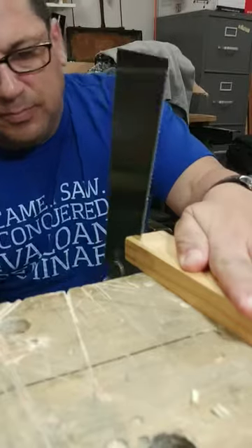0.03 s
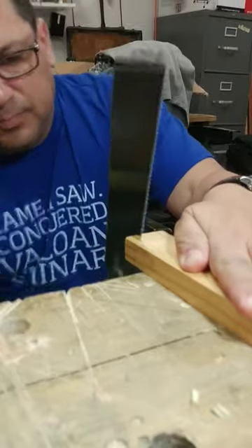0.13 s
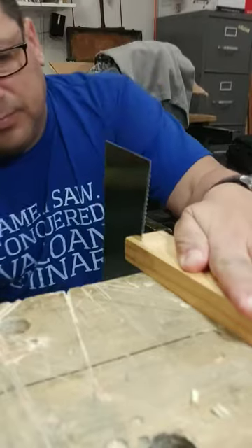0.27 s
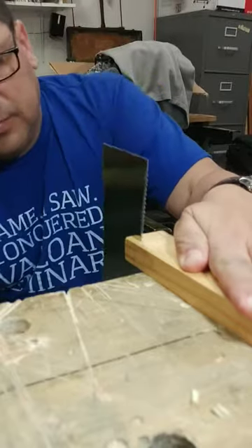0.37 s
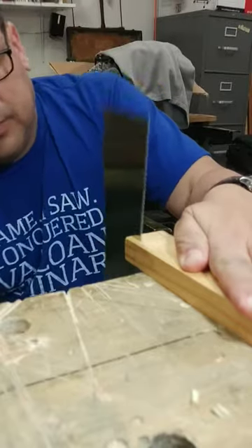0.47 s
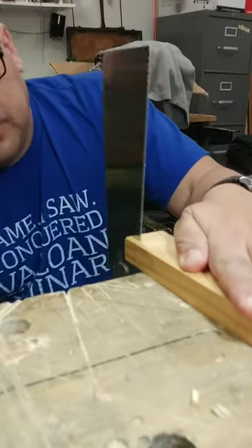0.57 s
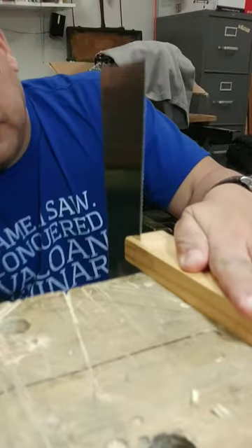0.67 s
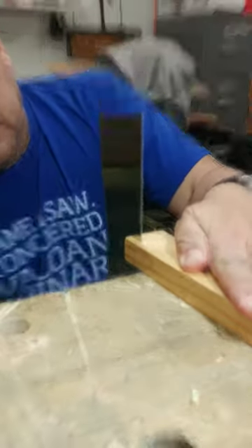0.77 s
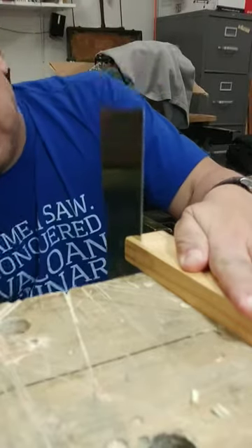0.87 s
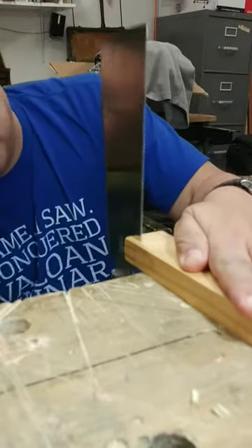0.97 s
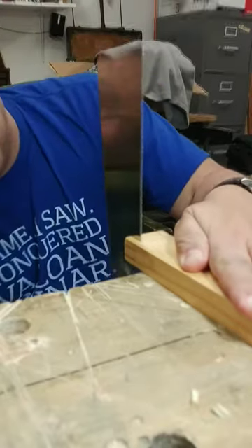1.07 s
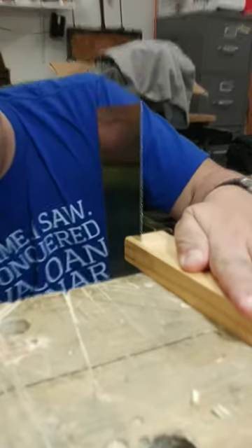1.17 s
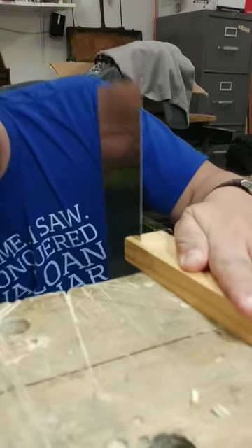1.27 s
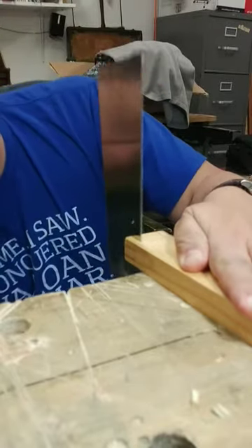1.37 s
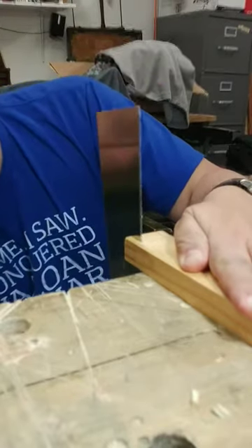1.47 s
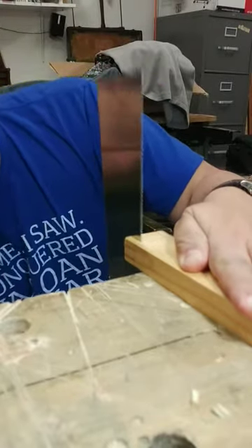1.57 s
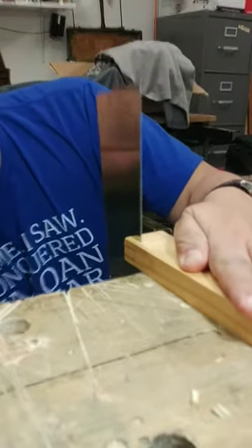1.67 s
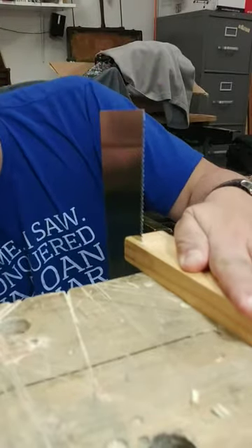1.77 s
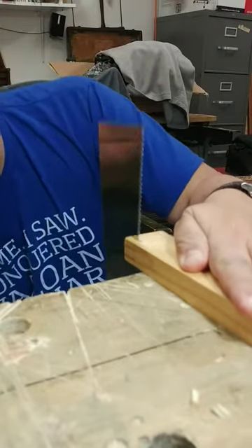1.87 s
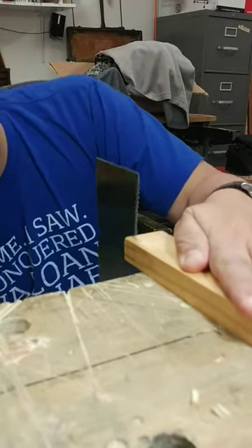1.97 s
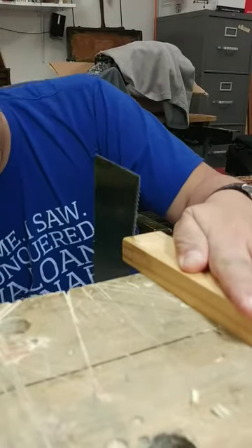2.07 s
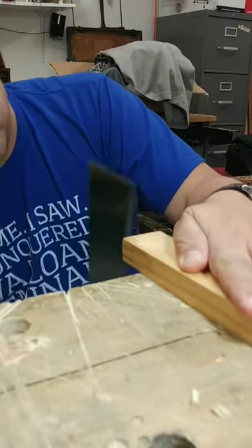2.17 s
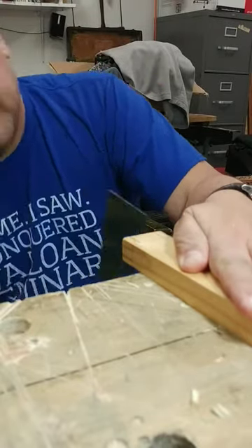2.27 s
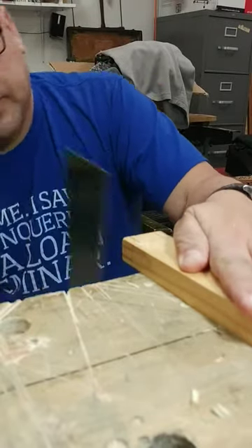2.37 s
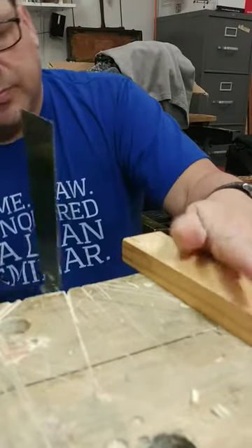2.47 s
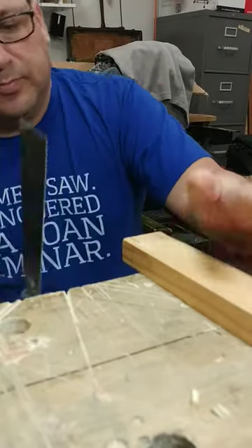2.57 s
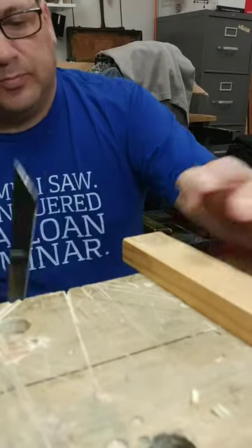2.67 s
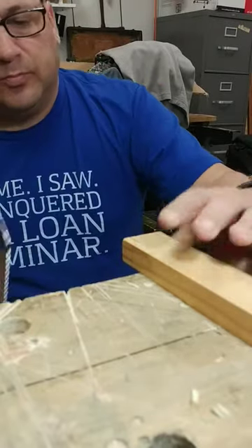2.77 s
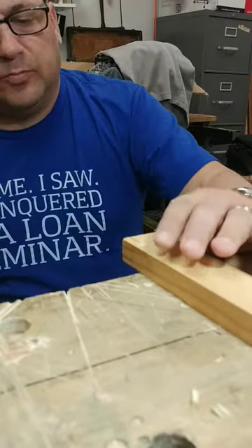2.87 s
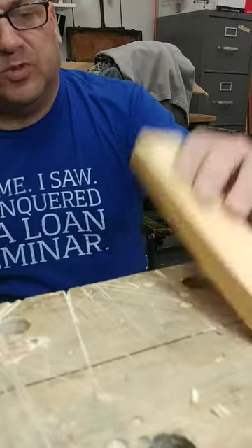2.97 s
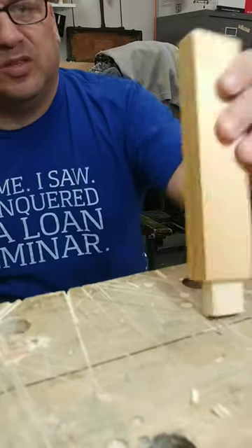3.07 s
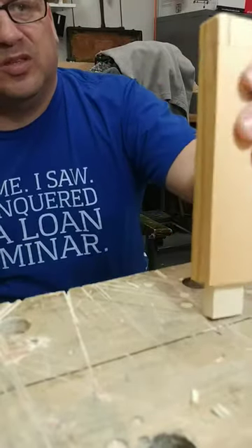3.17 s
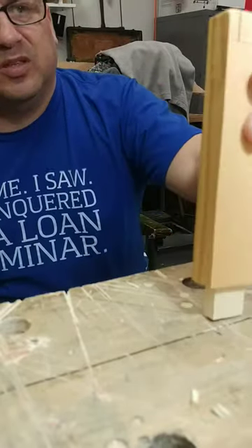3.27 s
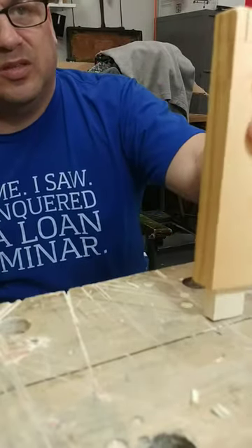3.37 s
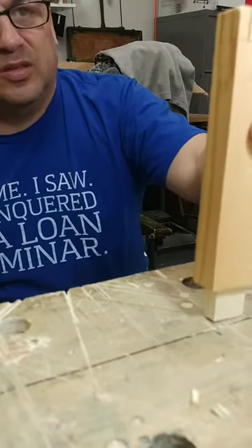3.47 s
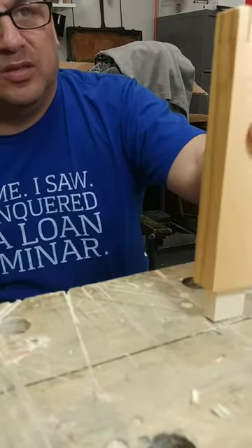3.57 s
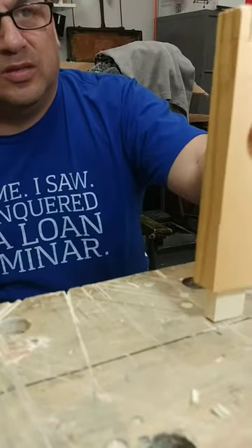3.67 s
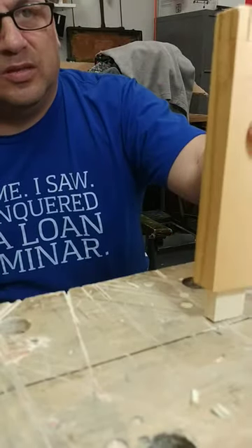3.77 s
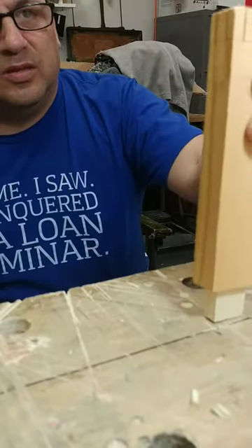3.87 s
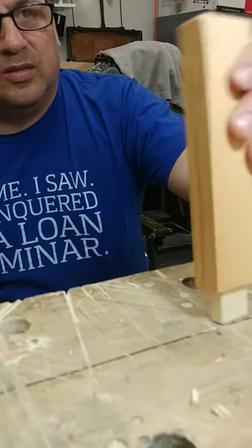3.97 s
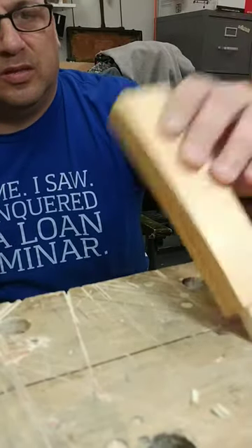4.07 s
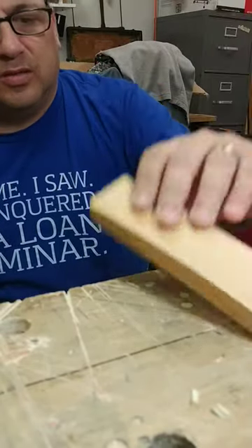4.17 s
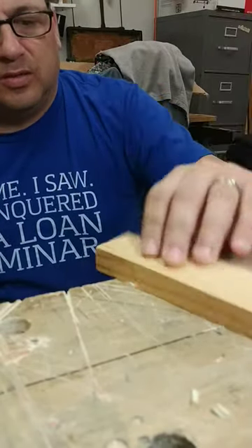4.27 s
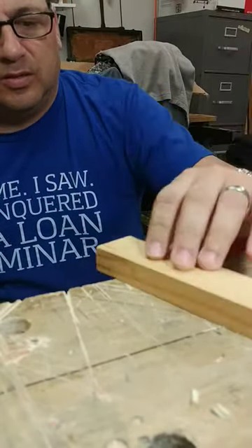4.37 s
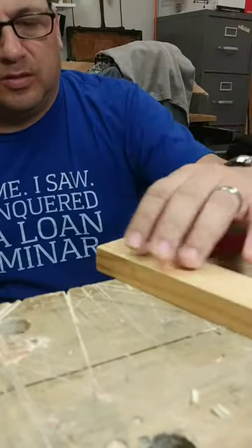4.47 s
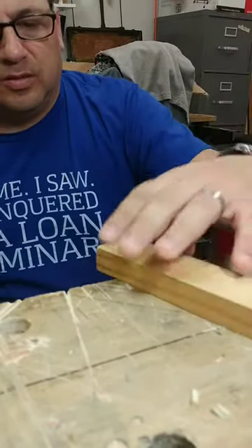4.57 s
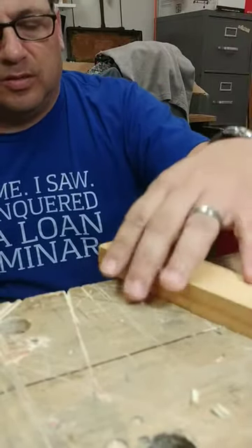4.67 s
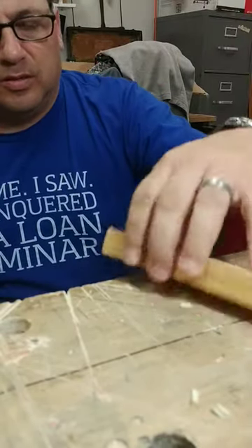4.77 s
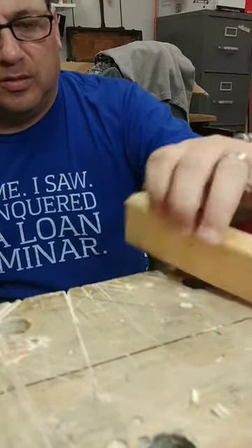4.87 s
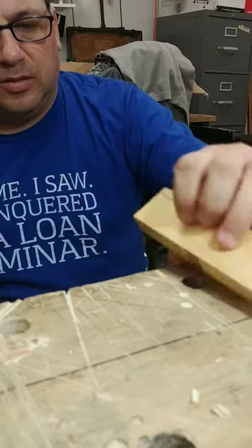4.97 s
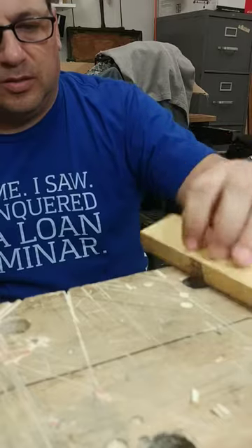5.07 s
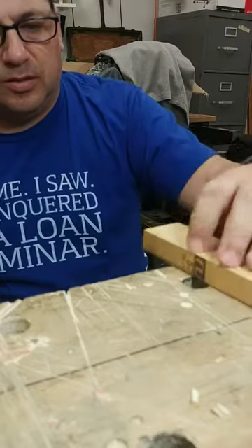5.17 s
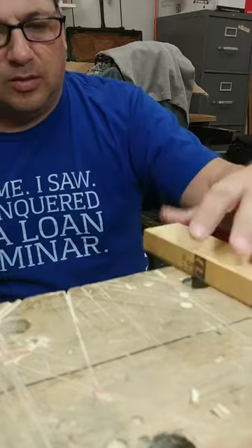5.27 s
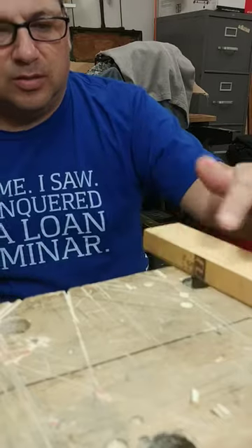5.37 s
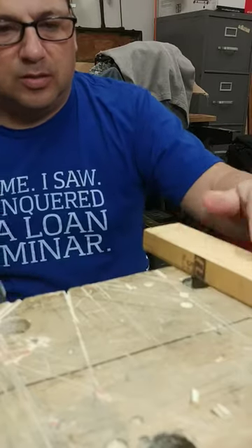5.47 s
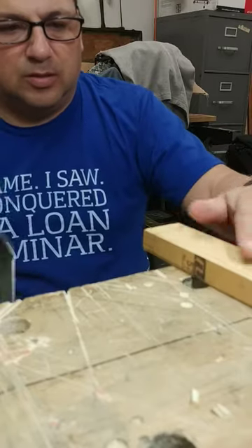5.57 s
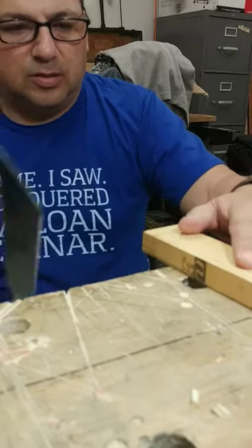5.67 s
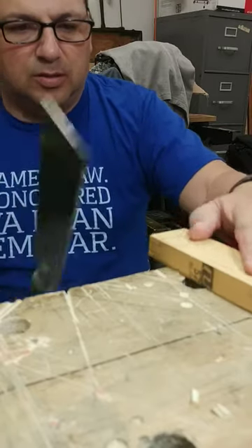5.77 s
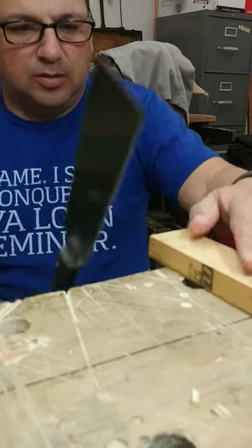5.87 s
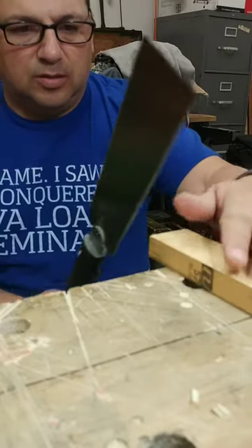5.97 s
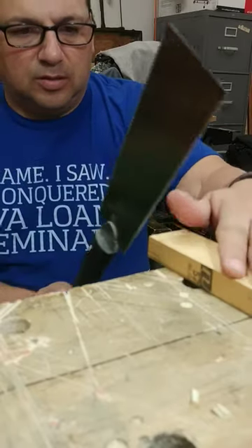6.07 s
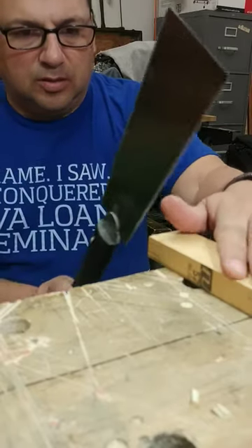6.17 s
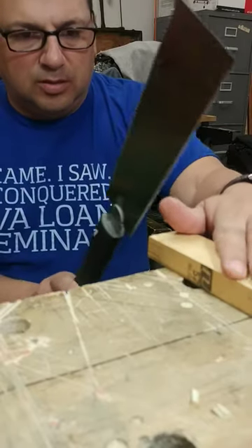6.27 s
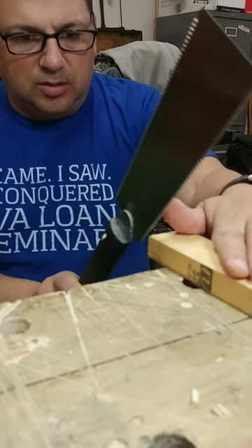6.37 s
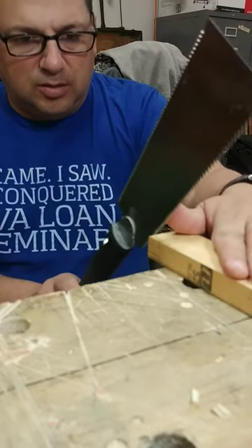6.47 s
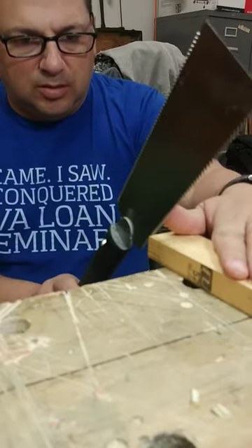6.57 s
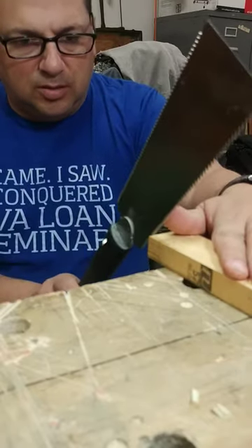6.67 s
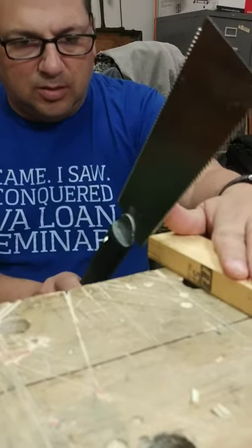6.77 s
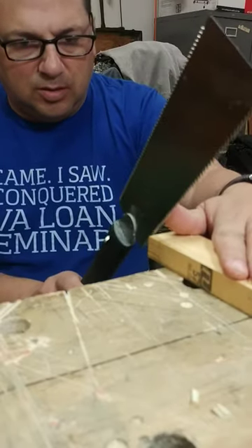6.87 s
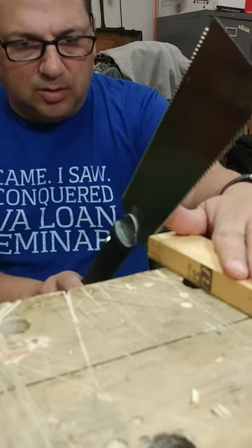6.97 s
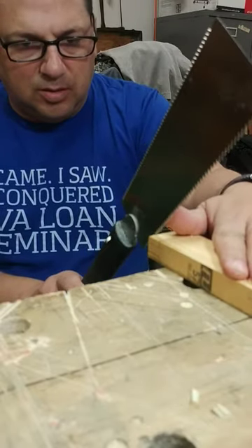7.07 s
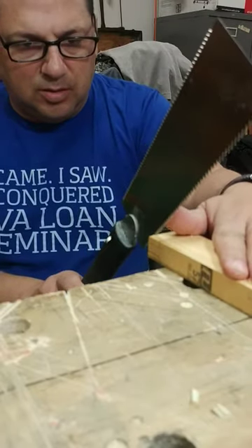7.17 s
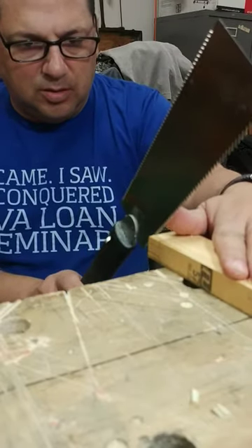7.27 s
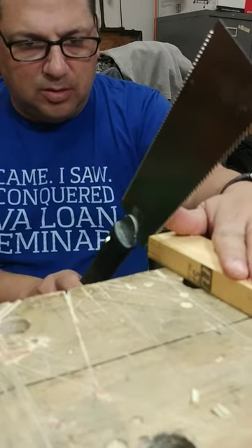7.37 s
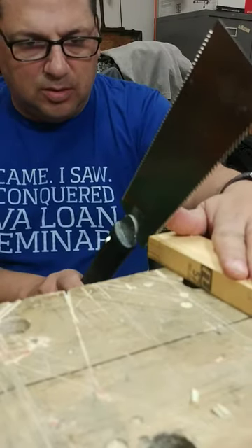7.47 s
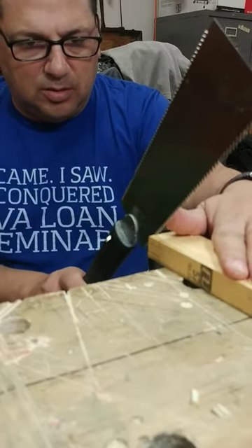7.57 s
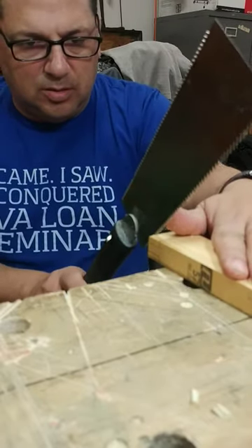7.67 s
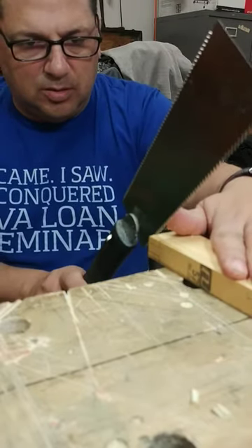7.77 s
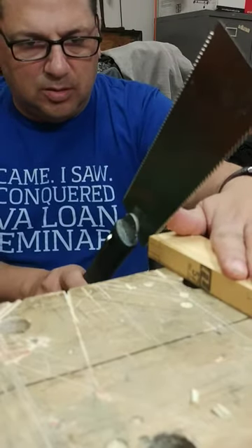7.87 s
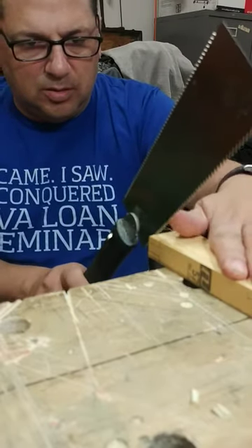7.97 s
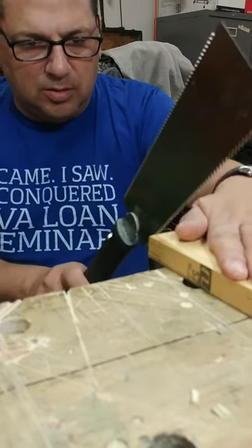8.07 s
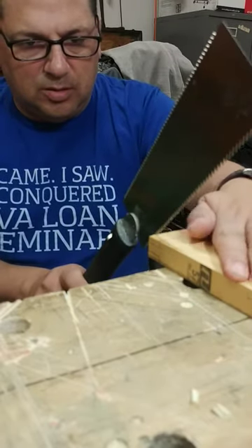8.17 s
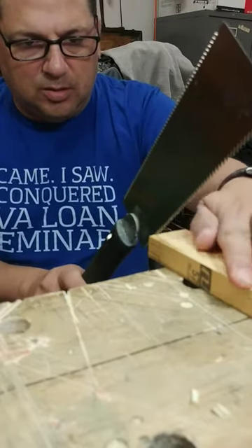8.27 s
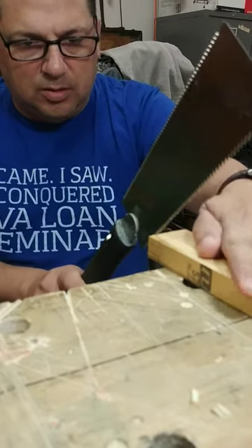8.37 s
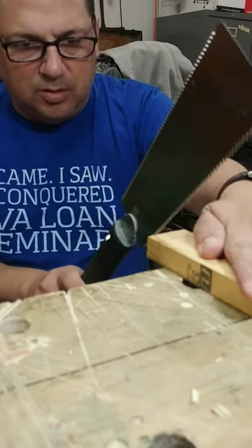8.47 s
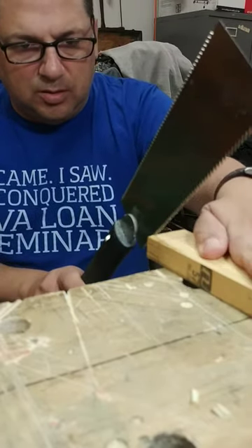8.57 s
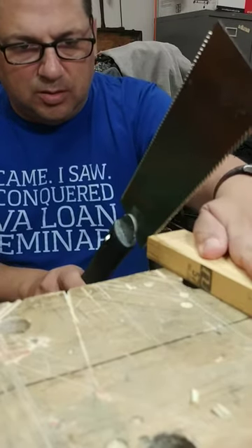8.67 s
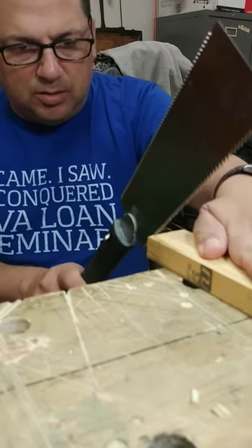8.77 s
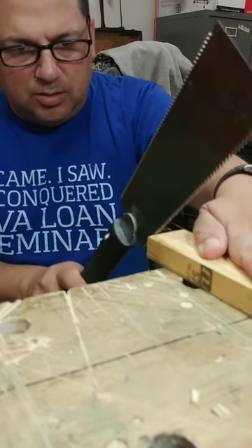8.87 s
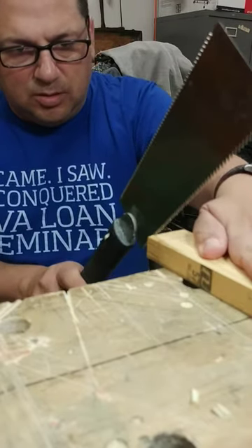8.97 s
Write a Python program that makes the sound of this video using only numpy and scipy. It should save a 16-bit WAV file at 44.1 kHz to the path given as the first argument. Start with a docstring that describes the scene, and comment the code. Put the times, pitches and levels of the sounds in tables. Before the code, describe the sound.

Close to a phone in a small workshop, a thin hand saw rasps through a board: loud, drumming pulls alternating with softer, noisier pushes. The last cuts turn thin and the freed blade rings faintly. The board then knocks, scrapes and squeaks on the bench, drops with loud double clacks, and is knocked once more. Only tiny rubs and taps remain over low rumble and faint hiss.

```python
"""In a small workshop a thin pull saw rasps through the end of a board on a bench, heard by a phone close by.
Stick-slip friction excites the wood: heavy pulls, light pushes, two thin last cuts; then the freed blade rings.
The board is slid, squeaks as it is stood on end, is knocked down twice and settled by hand: friction noise for
rubbing, damped resonances for blows. Scattering and a diffuse tail make the room, over a low rumble and hiss."""
import sys
import numpy as np
from scipy import signal
from scipy.fft import rfft, irfft
from scipy.io import wavfile
from scipy.ndimage import uniform_filter1d

SR = 44100
rng = np.random.default_rng(int(sys.argv[2]) if len(sys.argv) > 2 else 0)


def inscribe(sig):
    """Save sig as 16-bit PCM at rate SR to the path in sys.argv[1].

    A 1-D sig is mono; a 2-D sig holds one channel per row.
    Samples are clipped to [-1, 1] before scaling.
    """
    pcm = np.round(np.clip(np.atleast_2d(sig).T, -1, 1) * 32767)
    wavfile.write(sys.argv[1], SR, pcm.astype(np.int16))


N = 397782
T = np.arange(N) / SR
RING_T = T[:SR // 2]

# saw pulled, teeth biting: start_s, rise_s, hold_s, fall_s, level_db, hiss_db (tooth hiss relative to level)
PULL_STROKES = [(0.211, 0.021, 0.093, 0.1, -7, -26.5), (0.737, .022, 0.094, 0.052, -7.5, -26),
                (1.118, 0.038, 0.084, 0.07, -7.5, -26), (1.452, .028, .075, .055, -8.5, -25),
                (1.72, 0.027, .049, 0.07, -8, -27)]
# the last fibres give way: start_s, rise_s, hold_s, fall_s, level_db, hiss_db (relative to level)
LAST_STROKES = [(1.925, .022, 0.092, .07, -15.5, -22), (2.215, .014, 0.044, .025, -27, -20.5)]
# colour of teeth skating through wood: frequency_hz, gain_db
SKATING_COLOUR = [(35, -32), (70, -8), (125, -3), (220, -1.5), (350, 1.5), (430, -1.5), (700, -3.5),
                  (1100, -3.5), (1700, -18), (2700, -21.5), (3600, -38), (6000, -36.5), (9000, -36),
                  (15000, -57)]
# resonances of the board held down on the bench: frequency_hz, width_hz, boost_db
HELD_BOARD_MODES = [(127, 14, 13), (492, 61, 8.5), (565, 90, 4), (1362.6, 70, 7.5), (2760, 110, 1.5)]


def undb(db):
    """Decibels to amplitude ratio: 20 dB is a factor of ten."""
    return 10 ** (np.asarray(db) / 20)


def unit(h):
    """Energy normalisation: a response scaled so that its squares sum to 1."""
    return h / np.sqrt(np.sum(h ** 2, axis=-1, keepdims=True))


def ring(x, h):
    """Linear system: the output is the input convolved with the impulse response."""
    return signal.fftconvolve(np.atleast_2d(x), np.atleast_2d(h), axes=-1)[:, :N]


def response(points, peaks=(), size=8192):
    """Minimum phase: a causal response from (Hz, dB) gains and (Hz, width Hz, boost dB) resonances."""
    hz, db = np.transpose(points)
    f = np.arange(size // 2 + 1) * SR / size
    gain = undb(np.interp(np.log(f + 1), np.log(hz), db))
    for centre, width, boost_db in peaks:
        detuning = 2 * (f - centre) / width
        gain = gain * np.sqrt(1 + (undb(boost_db) ** 2 - 1) / (1 + detuning ** 2))
    # folding the cepstrum onto positive times makes the response causal
    cepstrum = irfft(np.log(gain))
    cepstrum[1:size // 2] *= 2
    cepstrum[size // 2 + 1:] = 0
    impulse = irfft(np.exp(rfft(cepstrum)))
    return np.pad(impulse, (0, len(RING_T) - size))


def modes(rows):
    """Modal superposition: damped resonances (Hz, width Hz, dB) summed; a wider one decays faster."""
    total = 0
    for hz, width, db in rows:
        decay = np.exp(-np.pi * width * RING_T)
        total = total + undb(db) * unit(decay * np.cos(2 * np.pi * hz * RING_T))
    return unit(total)


def band(x, hz, kind, order=2):
    """Butterworth filtering: low-pass or high-pass with a maximally flat passband."""
    sections = signal.butter(order, min(hz, .45 * SR), kind, fs=SR, output="sos")
    return signal.sosfilt(sections, x)


def add(out, s, sound):
    """Superposition: mix a sound in from time s (seconds)."""
    start = max(int(s * SR), 0)
    out[start:start + len(sound)] += sound[:N - start]


def walk(rate):
    """Smoothed random process: rate new values per second, spread near 1."""
    k = max(int(SR / rate), 1)
    steps = np.repeat(rng.standard_normal(N)[:N // k + 1], k)[:N]
    return 1.2 * uniform_filter1d(steps, k)


def gesture(start, rise, hold, fall, depth_db, sag_db):
    """Force envelope: a movement swells from depth_db below its top, sags while held, dies away and stops."""
    edge_s = 0.011  # time for a contact to make or break
    corners = start + np.cumsum(np.abs([0, rise, hold, fall]))
    gate = np.clip(np.minimum(T - corners[0], corners[-1] - T) / edge_s + 1, 0, 1)
    on = gate > 0
    gate[on] *= undb(np.interp(T[on], corners, [-depth_db, 0, -sag_db, -depth_db]))
    return gate


def effort(moves, depth_db, sag_db):
    """Amplitude modulation: force and hiss of a set of hand movements, silent between them."""
    # the hand never presses quite evenly
    uneven_db, uneven_per_s = 1.16, 22

    def movement(start, rise, hold, fall, db, hiss_db, fading=0):
        """Hiss follows force, fading by so many dB per second (growing if negative)."""
        force = undb(db) * gesture(start, rise, hold, fall, depth_db, sag_db)
        elapsed = np.clip(T - start, 0, rise + hold + fall)
        return np.array([force, force * undb(hiss_db - fading * elapsed)])

    return sum(movement(*move) for move in moves) * undb(uneven_db * walk(uneven_per_s))


def catches(rate, jitter, spread_db, tear_s):
    """Stick-slip: uneven snaps at a rate (Hz), each with a puff of tearing fibres; both have rms near 1."""
    phase = np.cumsum(rate * np.exp(jitter * walk(400))) / SR
    at = np.flatnonzero(np.diff(np.floor(phase)))
    snaps = np.zeros(N)
    snaps[at] = undb(spread_db * np.clip(rng.standard_normal(N)[:len(at)], -2, 2))
    # the hand keeps the mean force steady
    snaps /= np.sqrt(np.abs(uniform_filter1d(snaps ** 2, size=1500)) + 1e-9)
    puff = np.abs(ring(snaps ** 2, unit(np.exp(-RING_T / tear_s)) ** 2)[0])
    tearing = np.sqrt(puff) * rng.standard_normal(N)
    return snaps - uniform_filter1d(snaps, size=700), tearing


def scrape(force, hiss, contact, body, snap_share):
    """Source and resonator: snaps and tearing shake the wood; above about 4 kHz the fibres hiss by themselves."""
    # share of hiss power that both ports hear alike; the rest comes from all along the blade and board
    alike = .55
    snaps, tearing = contact
    share = np.clip(snap_share, 0, 1)
    drive = np.sqrt(share) * snaps + np.sqrt(1 - share) * tearing
    wood = band(body, 4400, "low", order=4)
    wood = wood / np.linalg.norm(band(wood, 230, "high"))
    random_signs = np.sign(rng.standard_normal((2, N)))
    fibres = tearing * (np.sqrt(alike) + np.sqrt(1 - alike) * random_signs)
    hiss_colour = unit(band(body, 4200, "high", order=4))
    return ring(force * drive, wood) + undb(-3.5) * ring(hiss * fibres, hiss_colour)


def tooth_rate(strokes, top_hz):
    """Kinematics: teeth per second follow the speed of the arm, rising and falling in every stroke."""
    speed = np.zeros(N)
    for start, rise, hold, fall, *_ in strokes:
        speed += np.sin(np.pi * np.clip((T - start) / (rise + hold + fall), 0, 1))
    return top_hz * (.35 + .65 * speed)


def pulls():
    """Stick-slip into a coupled resonator: on the pull the teeth bite, and the whole bench drums."""
    # colour of biting teeth: frequency_hz, gain_db
    biting_colour = [(35, -39.5), (70, -12), (125, -6.5), (190, -13), (350, -7), (430, -15), (700, -13.5),
                     (1100, -11.5), (1700, -23.5), (2700, -27), (3600, -38), (6000, -38), (9000, -41),
                     (15000, -53)]
    contact = catches(tooth_rate(PULL_STROKES, top_hz=719.7), jitter=.35, spread_db=3.0, tear_s=.0012)
    body = band(response(biting_colour, HELD_BOARD_MODES), 55, "high")
    force, hiss = effort(PULL_STROKES, depth_db=19.5, sag_db=1.5)
    return scrape(force, hiss, contact, body, snap_share=0.71)


def pushes():
    """Sliding friction, mostly noise: on the push the teeth skate through the kerf on their backs."""
    # saw pushed back: start_s, rise_s, hold_s, fall_s, level_db, hiss_db (relative to level)
    push_strokes = [(0.0, 0.0059, 0.08, .04, -14, -24), (0.475, .085, 0.073, .075, -11.5, -24.5),
                    (0.925, .065, .052, .045, -12, -21.5), (1.328, .034, .036, .038, -12.5, -25),
                    (1.608, 0.034, 0.026, .046, -13, -24)]
    contact = catches(tooth_rate(push_strokes, top_hz=742.7), jitter=0.43, spread_db=1.0, tear_s=.0011)
    body = response(SKATING_COLOUR, HELD_BOARD_MODES)
    force, hiss = effort(push_strokes, depth_db=17.5, sag_db=3.5)
    return undb(1.58) * scrape(force, hiss, contact, body, snap_share=0.23)


def last_cuts():
    """Weak coupling: with little wood left the teeth no longer shake the bench, leaving a thinner rasp."""
    contact = catches(tooth_rate(LAST_STROKES, top_hz=833.0), jitter=.35, spread_db=4.5, tear_s=0.0016)
    body = band(response(SKATING_COLOUR, HELD_BOARD_MODES), 500, "high", order=1)
    force, hiss = effort(LAST_STROKES, depth_db=22, sag_db=-1.0)  # negative sag: grows while held
    return undb(1.5) * scrape(force, hiss, contact, body, snap_share=0.98)


def flex():
    """Bending vibration: strokes bend the thin blade; its tones wander with the bend and linger between strokes."""
    # bending tones of the blade in the kerf: frequency_hz, level_db (relative to the stroke)
    bending_tones = [(660, -13), (830, -22.5)]
    force, _ = effort(PULL_STROKES + LAST_STROKES, depth_db=19.5, sag_db=0.5)
    stored = ring(force, unit(np.exp(-RING_T / .17)) ** 2)
    tones = np.zeros(N)
    for hz, db in bending_tones:
        level = undb(db + 1.9 * walk(58))
        phase = 2 * np.pi * np.cumsum(hz * (1 + 0.051 * walk(22))) / SR
        tones += level * np.sin(phase)
    return stored * tones


def blade():
    """Free decay of modes: the steel sings on when the teeth leave the wood, until the saw is laid down."""
    # modes of the steel blade: frequency_hz, t60_s, level_db
    steel_modes = [(608, .6, -48), (846, .7, -59), (2039, 1.8, -60.5), (5810, .35, -61.5),
                   (6391, 0.36, -56), (7505, 0.45, -63), (7960, .45, -61), (9809, 1.2, -66.5),
                   (11145, .5, -67.5)]
    # the blade springs free: start_s, gain_db
    springs_free = [(0.098, -8), (2.27, 5.5)]
    # the saw is laid down and its ring is stopped
    stopped_s, stop_decay_s = 2.67, .02
    t = T[:2 * SR]
    song = np.zeros(len(t))
    for hz, t60, db in steel_modes:
        song += undb(db - 60 * t / t60) * np.sin(2 * np.pi * hz * t)
    out = np.zeros(N)
    for s, db in springs_free:
        add(out, s, undb(db) * song)
    return out * np.exp(-np.maximum(T - stopped_s, 0) / stop_decay_s)


def knocks():
    """Impact excitation: blows ring board and bench top, duller if softer; the bench frame thuds below."""
    # the board meets the bench, before group gain: time_s, peak_db, sharpness_db, thud_db
    contacts = [(2.579, -24.5, -29.5, -39.5), (3.032, -15.5, -21, -37.5), (3.114, -29, 9, -37),
                (3.14, -38, -19, -28), (4.34, 3.5, -8.5, -25), (4.374, 2, -5, -25), (4.768, -40, -3, -42),
                (4.8, -33, -32.5, -50), (4.973, -17, -26, -32), (5.037, -22.5, -34.5, -31),
                (5.144, 4.5, -19, -30), (6.077, -41.5, -37.5, -37), (6.685, -53.5, -20, -43.5),
                (7.293, -46.5, -16, -61), (7.378, -47.5, -12, -68), (7.721, -42.5, -15, -68),
                (7.82, -58, -27, -43), (8.605, -39, -16, -36.5)]
    # near walls throw a knock back: delay_s, level_db
    wall_echoes = [(.0042, -13.5), (0.0173, -11), (.036, -15)]
    # colour of the blows: frequency_hz, gain_db
    blow_colour = [(50, -43.5), (130, -31), (220, -1.5), (400, 2), (550, 5), (1100, 6), (1600, -1.5),
                   (2400, -8), (4000, -14), (8000, -41.5), (15000, -51)]
    # resonances of the loose board and bench top: frequency_hz, width_hz, boost_db
    loose_board_modes = [(501, 30, 7.5), (583.4, 71, 2.5), (780, 25, -2), (1047, 50, 1), (1193, 100, 0),
                         (1340, 67, 3), (1568, 22, 7.5), (1850, 30, 1), (2190, 34, 5.5)]
    blows, thuds = np.zeros(N), np.zeros(N)
    body = response(blow_colour, loose_board_modes)
    frame = modes([(70, 25, -4.5), (103, 17, 8), (121.2, 6.5, 12.5)])
    for s, db, sharp_db, thud_db in contacts:
        # a softer contact lasts longer and so has a lower cutoff
        cutoff_hz = 3400 * undb(0.52 * sharp_db)
        blow = band(body, cutoff_hz, "low", order=4) + undb(-26.5) * body
        blow = undb(db) * blow / np.abs(blow).max()
        add(blows, s, blow)
        for delay_s, echo_db in wall_echoes:
            add(blows, s + delay_s, undb(echo_db) * blow)
        add(thuds, s, undb(thud_db) * frame / np.abs(frame).max())
    low_thuds = band(band(thuds, 160, "low"), 60, "high")
    return undb(0.5) * blows + undb(5.5) * low_thuds


def slides():
    """Irregular stick-slip: the board's edge judders over the dusty bench."""
    # board dragged: start_s, rise_s, hold_s, fall_s, level_db, hiss_db (relative), hiss_fading_db_per_s
    drags = [(2.964, 0.011, 0.043, .01, -53, -10, -150), (3.03, 0.0059, .11, 0.038, -26, -15, -50),
             (4.048, 0.039, 0.087, .13, -25.5, -6, 75), (4.85, 0.086, .035, 0.028, -34.5, -7, -1),
             (4.968, 0.0065, 0.011, .025, -25, -16, -8)]
    # colour of the drag: frequency_hz, gain_db
    drag_colour = [(60, -23), (170, -13), (290, 5.5), (620, -7), (850, -16.5), (1150, -10.5), (1700, -21.5),
                   (2700, -24), (3700, -33.5), (5400, -34), (6300, -22.5), (7500, -29.5), (10500, -28),
                   (15000, -57)]
    # resonances of the board dragged on its edge: frequency_hz, width_hz, boost_db
    edge_modes = [(466, 38, 0), (1130, 60, 8.5), (2967, 40, 20.5), (6010, 120, 15)]
    contact = catches(350, jitter=.7, spread_db=-0.5, tear_s=0.0034)
    force, hiss = effort(drags, depth_db=23.5, sag_db=0.0)
    return undb(-1.0) * scrape(force, hiss, contact, response(drag_colour, edge_modes), snap_share=0.14)


def squeak():
    """Stick-slip driving one mode: dry end grain chatters on the bench and rings a narrow resonance."""
    # the board's end as it is stood up: start_s, rise_s, hold_s, fall_s, level_db
    end_grain_moves = [(3.044, 0.022, .035, 0.027, -34), (3.107, .006, 0.0061, 0.041, -26.5)]
    snaps, _ = catches(420, jitter=0.44, spread_db=10, tear_s=.001)
    force = np.zeros(N)
    for *timing, db in end_grain_moves:
        force += undb(db) * gesture(*timing, depth_db=28, sag_db=3.5)
    return ring(snaps * force, modes([(2980, 130, 0)]))


def rubs():
    """Fine-grained friction: light rubs of blade, board and fingers, with overlapping puffs."""
    # light rubs: start_s, rise_s, hold_s, fall_s, level_db, hiss_db (relative), hiss_fading_db_per_s
    light_moves = [(2.345, .02, 0.023, 0.11, -53, 6.5, 2), (2.688, 0.018, .008, 0.038, -45.5, -9.5, 2),
                   (2.7, 0.048, 0.044, 0.073, -61, 6.5, 2), (4.755, 0.0064, 0.1, 0.045, -44.5, -17.5, -94),
                   (5.03, 0.013, 0.11, 0.018, -49, -6.5, 4), (5.69, .11, 0.028, 0.1, -37.5, -18, -2),
                   (6.055, 0.023, .012, 0.038, -58, -3.5, 0), (7.73, .02, 0.095, .2, -66, -9, 0),
                   (8.19, .02, 0.012, 0.034, -67.5, 2.5, 0), (8.255, 0.026, 0.14, 0.057, -58, -16.5, -100),
                   (8.48, 0.041, 0.0068, 0.043, -56, 3, 5), (8.6, 0.025, .012, 0.044, -53, -1.5, 4)]
    # colour of rubbing: frequency_hz, gain_db
    rubbing_colour = [(100, -14), (280, 2.5), (500, 9), (1100, 1), (2000, -16), (3000, -30), (4000, -46.5),
                      (5000, -45), (9000, -47.5), (15000, -62)]
    # resonances woken by light rubbing: frequency_hz, width_hz, boost_db
    rubbed_modes = [(504, 78, 5.5), (1250, 250, 2.5), (4850, 81, 10)]
    contact = catches(790, jitter=0.97, spread_db=4.5, tear_s=0.023)
    force, hiss = effort(light_moves, depth_db=18, sag_db=2.5)
    return undb(2.7) * scrape(force, hiss, contact, response(rubbing_colour, rubbed_modes), snap_share=0.51)


def ticks():
    """Brief impact: a tiny hard contact gives a noisy crack and one short damped ring."""
    # small dry ticks: time_s, level_db (before a 5 dB cut), ring_hz
    hard_contacts = [(3.272, -37.5, 4100), (3.5693, -39.5, 3400), (3.601, -51, 3200), (5.5613, -47, 3470),
                     (6.289, -44.5, 5400), (7.4546, -51.5, 6190)]
    out = np.zeros(N)
    for s, db, hz in hard_contacts:
        crack = band(rng.standard_normal(len(RING_T)), 3900, "low") * np.exp(-RING_T / 0.00097)
        tone = np.sin(2 * np.pi * hz * RING_T) * np.exp(-RING_T / 0.0015)
        add(out, s, undb(db - 5) * (1.4 * crack + tone))
    return out


def floor():
    """Filtered noise: a wavering low rumble, nearly alike on both sides, under faint even hiss."""
    # colour of the background: frequency_hz, gain_db
    background_colour = [(20, -26), (55, -3.5), (110, -6), (180, -15.5), (330, -24.5), (520, -17),
                         (1000, -25), (2000, -35), (4500, -33), (8000, -39), (11000, -39.5), (15000, -56)]
    rumble_db, wander_db = -57.5, -1
    air = ring(rng.standard_normal((2, N)), unit(response(background_colour)))
    rumble = band(air[0] + .25 * air[1] * np.array([[1], [-1]]), 170, "low")
    return undb(rumble_db + wander_db * walk(3)) * rumble + undb(-64.0) * band(air, 240, "high")


def workshop(x, smear_s, tail_db, pan_db, size=1024, order=200):
    """Dispersion and reverberation: blade and bench scatter the treble over milliseconds; the room adds a tail."""
    # phase by which the left port leads for sound from the bench: frequency_hz, lead_radians
    left_lead = [(0, 0.5), (1030, -0.98), (1460, -2.5), (2240, -11.5), (3000, -14), (15000, -26.5)]
    # below alike_hz the room sounds much the same at both ports
    room_t60_s, alike_hz = 0.4, 420
    opposite = np.array([[1], [-1]])
    f = np.arange(len(RING_T) // 2 + 1) * SR / len(RING_T)
    lag = np.abs(uniform_filter1d(rng.standard_normal(len(f)), size=200))
    lag = uniform_filter1d(lag, size=150)
    lag = smear_s * lag / lag.mean() * f ** 4 / (f ** 4 + 1200 ** 4)
    # every frequency arrives after its own lag, at full strength
    lead = np.interp(f, *np.transpose(left_lead)) * .5 * opposite
    lag_phase = 2 * np.pi * np.cumsum(lag) * f[1]
    # order samples of room for what the phase lead puts before time zero
    near = np.roll(irfft(np.exp(1j * (lead - lag_phase))), order, axis=1)
    near[:, size:] = 0
    mid, side = rng.standard_normal((2, len(RING_T)))
    diffuse = mid + band(side, alike_hz, "high", order=1) * opposite
    tail = unit(diffuse * undb(-60 * RING_T / room_t60_s) * np.clip(RING_T / 0.0055, 0, 1))
    tail_colour = response([(100, -10.5), (300, -1.5), (620, 6), (1500, -4), (4000, 1.5), (12000, -3.5)])
    tail = ring(tail, tail_colour)[:, :len(RING_T)]
    # a negative pan leans to the right
    direct = ring(x, undb(pan_db * opposite / 2) * near)
    direct = np.roll(direct, -order, axis=1)
    direct[:, -order:] = 0
    return direct + undb(tail_db) * ring(x, tail)


def scene():
    """Superposition of sources: sawing, then handling of the board, over the background."""
    saw = workshop(pulls() + pushes() + flex(), smear_s=.0014, tail_db=-8.0, pan_db=-1.76)
    finish = workshop(last_cuts(), smear_s=0.0025, tail_db=-10.0, pan_db=-4.5)
    friction = slides() + squeak() + rubs() + ticks()
    handling = workshop(friction, smear_s=0.0013, tail_db=-11.0, pan_db=-3.0)
    blows = workshop(knocks(), smear_s=0.0026, tail_db=-1.0, pan_db=-2.5)
    return saw + finish + handling + blows + blade() + floor()


def record(dry):
    """Transduction: each port has its own resonances; the phone rounds the highest peaks and cuts the top."""
    # the two microphone ports: frequency_hz, left_db, right_db
    port_gains = [(129, -0.5, -3.5), (350, -1, 0), (970, -4, -2), (1400, -2, 2), (2000, -4.5, 3),
                  (2900, -7.5, 0.5), (4500, -0.5, -0.5), (6000, -2.5, 0), (7520, 0, 13), (8900, -6.5, -3.5),
                  (11100, 12, -3), (15000, 8.5, -9)]
    top_hz = 15600
    ports = np.array(port_gains)
    heard = ring(dry, [response(ports[:, [0, 1]]), response(ports[:, [0, 2]])])
    rounded = heard / (1 + heard ** 6) ** (1 / 6)
    low_pass = signal.ellip(8, .2, 70, top_hz, fs=SR, output="sos")
    return signal.sosfilt(low_pass, rounded)


dry = scene()
out = record(dry)
inscribe(out)
```